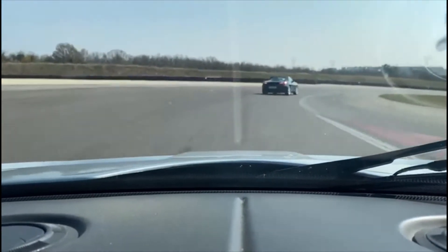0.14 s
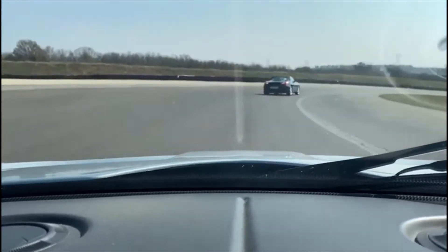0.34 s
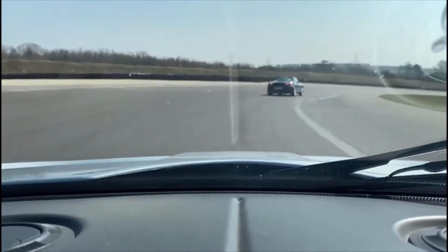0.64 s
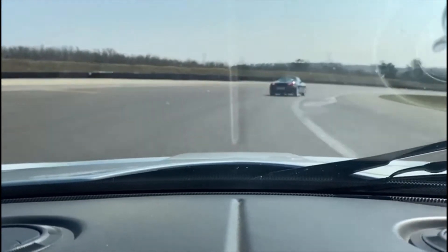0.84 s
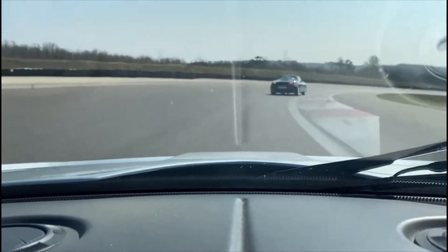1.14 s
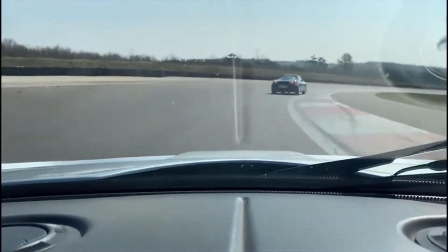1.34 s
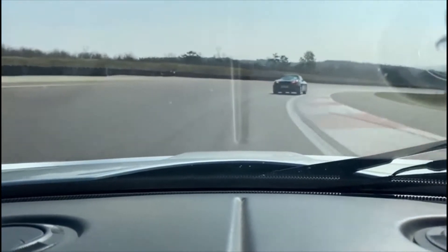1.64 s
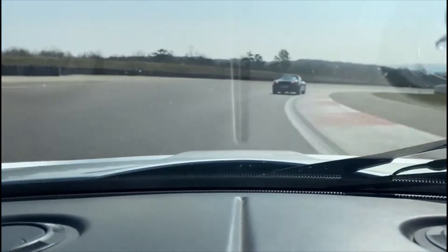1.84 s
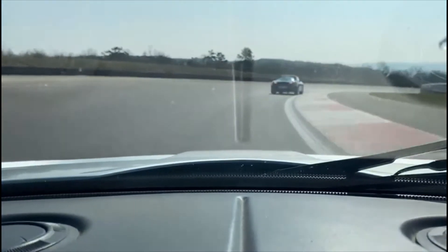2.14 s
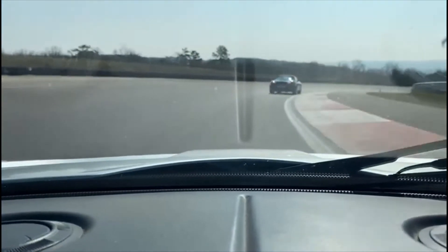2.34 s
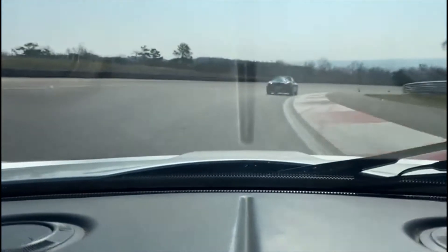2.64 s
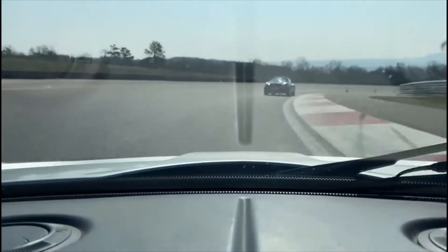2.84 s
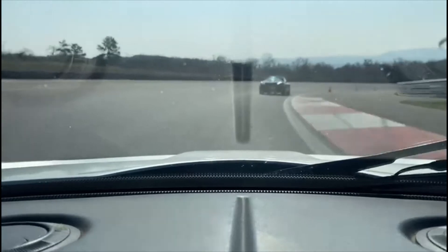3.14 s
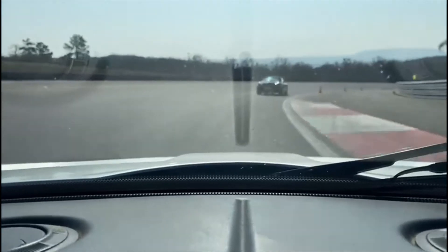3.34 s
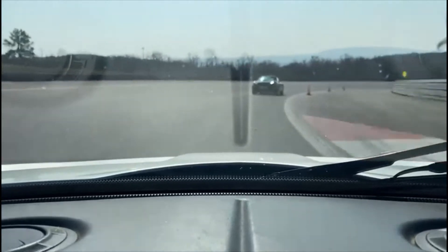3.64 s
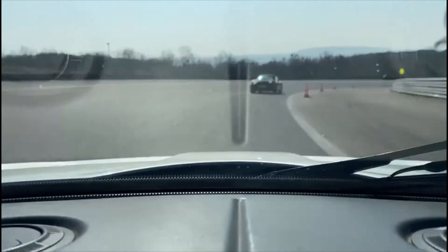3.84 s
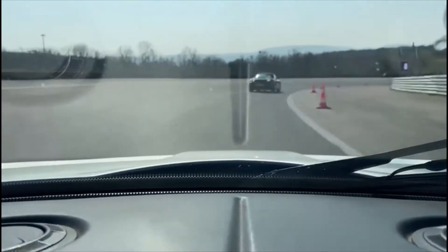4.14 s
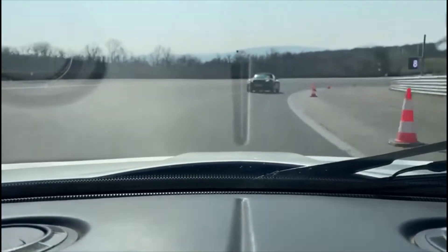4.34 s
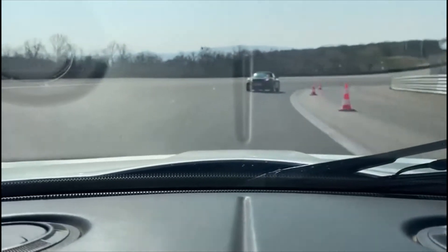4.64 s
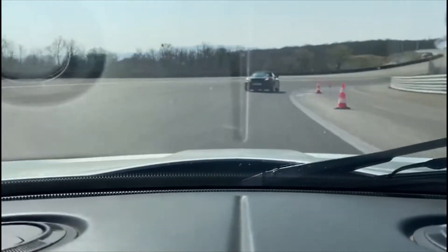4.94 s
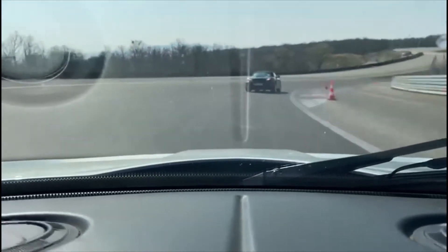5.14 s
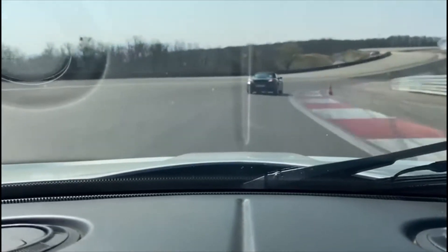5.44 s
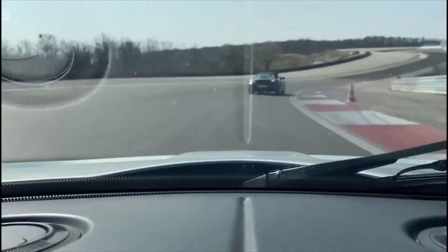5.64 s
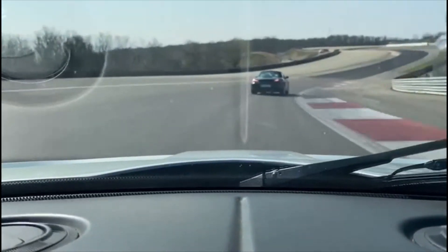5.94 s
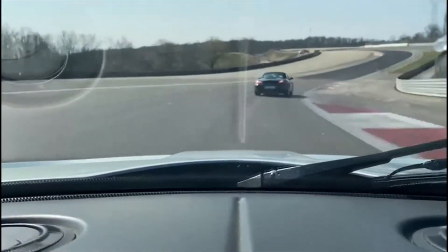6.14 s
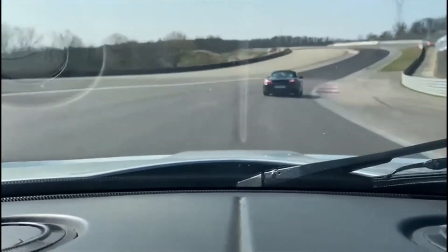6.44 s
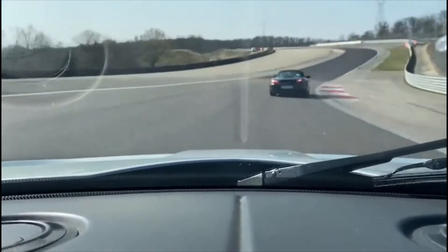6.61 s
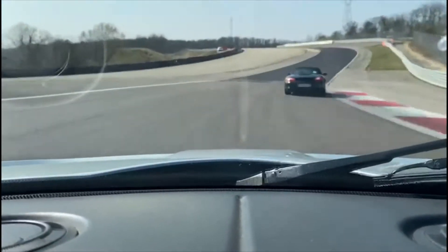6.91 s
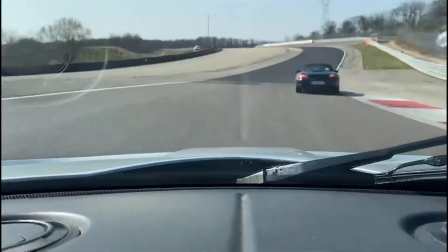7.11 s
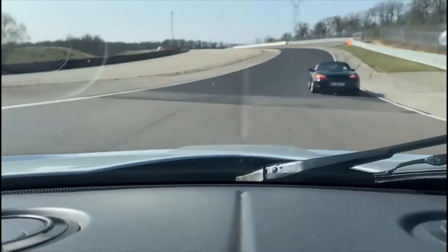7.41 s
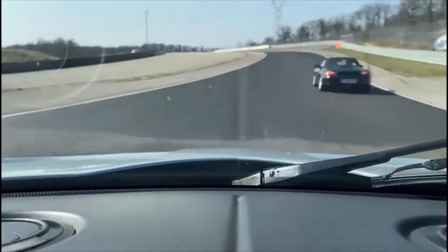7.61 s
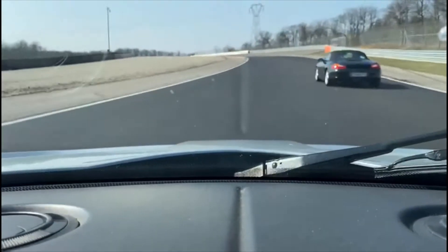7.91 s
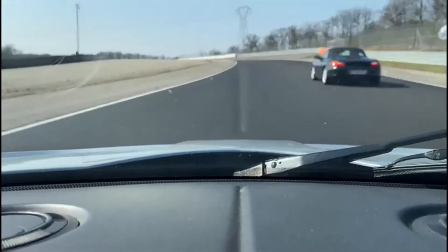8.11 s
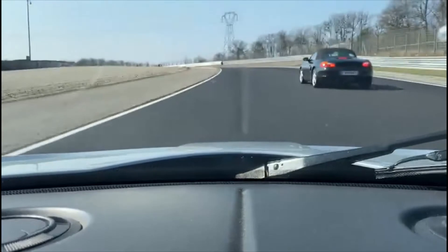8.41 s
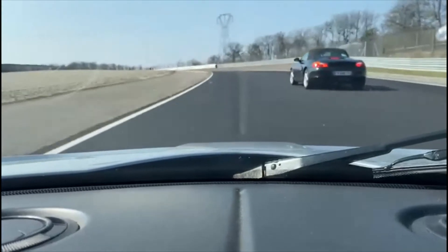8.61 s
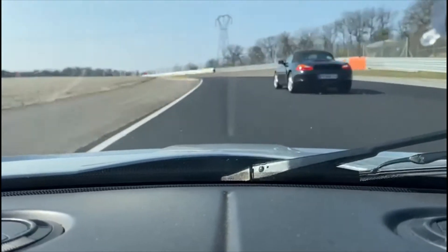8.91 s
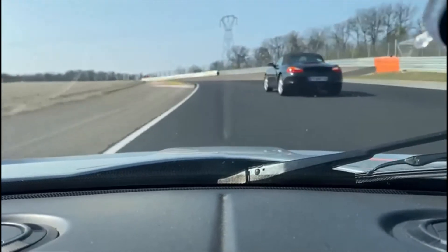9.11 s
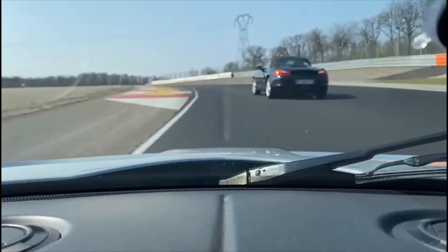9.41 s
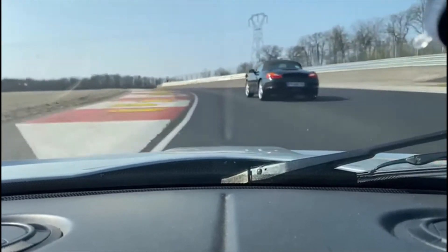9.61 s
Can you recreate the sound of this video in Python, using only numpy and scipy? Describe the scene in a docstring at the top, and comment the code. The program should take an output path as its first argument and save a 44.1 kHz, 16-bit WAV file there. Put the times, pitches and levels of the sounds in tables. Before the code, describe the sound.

Cabin-heard engine boom rises through a long pull over tyre rumble and wind roar, with grit ticks, a sudden lift and coast, then throttle returning.

```python
"""The firing note of a four-cylinder sports car on a race track, heard from behind the windscreen.
It sweeps through the cabin's standing waves: part throttle, a pull from 1.8 s to 7.7 s, then a coast;
the throttle reopens at 9.1 s. Exhaust overtones, rasp, intake hiss and mutter follow revs and throttle.
Shaped noise makes tyre rumble and wind roar; decaying bursts of noise are grit knocking on the body."""
import sys
import numpy as np
from scipy import signal
from scipy.fft import rfft, irfft
from scipy.io import wavfile
from scipy.ndimage import uniform_filter1d, minimum_filter1d

SR = 44100
rng = np.random.default_rng(int(sys.argv[2]) if len(sys.argv) > 2 else 0)


def to_wav(sig):
    """Store sig (one row per channel, or 1-D mono) as 16-bit WAV at the path in sys.argv[1].

    Samples outside -1..1 are clipped; the rate is SR.
    """
    pcm = np.clip(np.atleast_2d(sig), -1, 1) * 32767
    pcm = np.round(pcm).astype(np.int16)
    wavfile.write(sys.argv[1], SR, pcm.T)  # frames by channels


N = 430416
TIME = np.arange(N) / SR
BINS = np.fft.rfftfreq(N, 1 / SR)


def amp(db):
    """Logarithmic level: decibels to amplitude gain."""
    return 10 ** (np.asarray(db) / 20)


def curves(rows):
    """Linear interpolation in time: each column of a table at every sample."""
    s, *columns = np.transpose(rows)
    return [np.interp(TIME, s, column) for column in columns]


def response(rows, hz):
    """Frequency response: each column of a table, read in order along its sorted frequencies."""
    f, *columns = np.transpose(rows)
    return [np.interp(hz, np.sort(f), column) for column in columns]


def read(points, hz):
    """Spectral envelope: levels joined by straight lines over log frequency."""
    f, value = np.transpose(points)
    return np.interp(np.log(hz + 1), np.log(f + 1), value)


def noise(spectrum):
    """Filtered white noise: a random signal with the given power density per Hz."""
    white = rfft(rng.standard_normal(N))
    return irfft(white * amp(read(spectrum, BINS)), N) * np.sqrt(SR / 2)


def wander(rate_hz):
    """Low-passed chance: a slow random modulation of unit size, mostly below the given rate."""
    step = 64  # samples between the points drawn
    count = N // step + 2
    hz = np.fft.rfftfreq(count, step / SR)
    x = irfft(rfft(rng.standard_normal(count)) / (1 + (hz / rate_hz) ** 4), count)
    return np.interp(np.arange(N), np.arange(count) * step, x / x.std())


def pair(centre, across):
    """Sum and difference stereo: left and right from their common and opposed parts."""
    return np.array([centre + across, centre - across])


# engine speed: (time [s], firing rate [Hz])
FIRING_RATE = [(0.0, 153.8), (.6, 156.3), (1.08, 157.8), (1.45, 155.3), (1.85, 161.7), (2.43, 167.5),
               (3.13, 176.5), (3.8, 186.6), (4.44, 194.7), (4.96, 201.9), (5.74, 210.6), (6.4, 218.1),
               (7.04, 224.8), (7.65, 229.4), (7.74, 225.3), (8.0, 221.4), (8.26, 219), (8.72, 202.4),
               (9.1, 187.3), (9.48, 176.2), (9.76, 175)]
# the swing of the driveline after lifting off
SHUNT_S, SHUNT_DEPTH_HZ, SHUNT_RATE_HZ, SHUNT_DECAY_S = 7.68, 11.14, 4.19, 0.17


def revs():
    """Damped oscillation: lifting off rocks the driveline, so the firing rate swings and settles."""
    firing_hz, = curves(FIRING_RATE)
    t = np.maximum(TIME - SHUNT_S, 0)
    swing = np.sin(2 * np.pi * SHUNT_RATE_HZ * t) * np.exp(-t / SHUNT_DECAY_S)
    return firing_hz - SHUNT_DEPTH_HZ * swing


# moves of the pedal: (time [s], new throttle [0-1], time constant of the engine's answer [s])
PEDAL_MOVES = [(.35, 0.84, 0.051), (.72, 0.36, 0.1), (1.18, 0.55, 0.11), (1.759, 0.9, 0.028),
               (7.65, 0.21, 0.015), (9.12, 0.7, 0.12)]
FIRST_THROTTLE = 0.68  # 0-1


def pedal():
    """First-order lag: the throttle eases exponentially toward each new position of the pedal."""
    throttle = np.full(N, FIRST_THROTTLE)
    for s, position, lag_s in PEDAL_MOVES:
        throttle = position + (throttle - position) * np.exp(-np.maximum(TIME - s, 0) / lag_s)
    return np.clip(throttle, 0, 1)


def tone(angle, level_db, balance_db, lead):
    """Standing wave: one engine order reaches the two sides with unequal amplitude and phase."""
    tilt = amp(balance_db)
    size = 2 * amp(level_db) / np.sqrt(1 + tilt ** 2)  # keeps the mean power of the sides
    return size * np.array([tilt * np.cos(angle + lead / 2), np.cos(angle - lead / 2)])


# the cabin's standing wave at the firing rate: (frequency [Hz], level pulling [dB], level coasting [dB],
# left minus right at full throttle [dB], left lead [rad])
BOOM_RESPONSE = [(147, -24, -18, 6, 0), (156.1, -11.5, -11, 1, 0), (161.3, -12.5, -14, -0.5, 0.068),
                 (162.5, -21, -15, 6, -.3), (163.2, -20, -18, 4.5, -0.22), (168.8, -15.5, -15, -2, 0.22),
                 (168.3, -7.5, -15, -2, 0.092), (178.5, -4.5, -20, -1.5, -0.17),
                 (183.4, -7.5, -17.5, -0.5, -0.53), (192.6, -10.5, -23, -6, -.75),
                 (199.7, -8, -26, -4.5, -.35), (216, -15.5, -13.5, -2, -.55), (222, -13.5, -20, -1, -0.29)]
# the exhaust drone's standing wave, an octave higher: (frequency [Hz], level pulling [dB],
# level coasting [dB], left minus right [dB], left lead [rad])
DRONE_RESPONSE = [(304.7, -28.5, -44, -4, 1.6), (327, -10, -31, 2, 1.1), (331.5, -11, -30, 2.5, 1.2),
                  (337, -16.5, -33, 2, 1.86), (347, -24, -38.5, 12.5, 4.5), (349.5, -18.5, -32.5, 6, 6.4),
                  (369, -6.5, -39, -7.5, 7.04), (392.4, -13, -46.5, 1.5, 7.16),
                  (412.6, -20.5, -36, 0.5, 6.55), (438, -24, -39, 6, 7.65), (450, -20, -43, 25, 6.2),
                  (451, -21, -42, 17, 8), (460, -21.5, -46.5, 14, 7.9)]


def firing_note(angle, firing_hz, throttle):
    """Room modes: boom and octave drone sweep the cabin's resonances, less even as the throttle closes."""
    shut = 1 - throttle
    pull_db, coast_db, balance_db, lead = response(BOOM_RESPONSE, firing_hz)
    boom = tone(angle, throttle * pull_db + shut * coast_db, throttle * balance_db, lead)
    loud_db, soft_db, balance_db, lead = response(DRONE_RESPONSE, 2 * firing_hz)
    drone_db = soft_db + throttle ** 3 * (loud_db - soft_db)
    drone = tone(2 * angle + np.pi / 2, drone_db, balance_db, lead)
    # shares by which each tone flutters, pulling and coasting
    boom_rough = throttle * 0.0062 + shut * 0.15
    drone_rough = throttle * 0.061 + shut * 0.2
    return boom * (1 + boom_rough * wander(29)) + drone * (1 + drone_rough * wander(23))


# resonances of exhaust and cabin that make an overtone sing out: (multiple of the firing rate,
# firing rate [Hz], full width at half amplitude [Hz], best throttle [0-1],
# relative level common to both sides [dB], relative level opposed across the cabin [dB])
OVERTONE_RESONANCES = [(.5, 176, 16, 1, -32.5, -55.5), (.5, 227, 10, 1, -34.5, -54),
                       (.75, 215, 11, .9, -29.5, -50.5), (.75, 224.6, 9, .9, -32.5, -49),
                       (1.25, 158.4, 8, .6, -30, -43), (1.25, 165.8, 12, .9, -25.5, -48),
                       (1.25, 192.7, 14, .9, -36, -49.5), (1.5, 158.8, 8, .55, -34, -50),
                       (1.5, 162.5, 6, 1, -28.5, -39), (1.5, 180.5, 12, .8, -29.5, -41.5),
                       (1.5, 195.3, 3.3, 0, -22, -38), (1.5, 222, 17, .2, -34.5, -37),
                       (1.75, 174.4, 8, .9, -36.5, -36.5), (1.75, 197.6, 11, .9, -39.5, -42),
                       (2.5, 164.6, 6, .9, -54.5, -44), (2.5, 178.3, 7.5, 1, -31, -31),
                       (2.5, 220.2, 9, .9, -35.5, -37), (2.5, 227, 7, .9, -46, -26.5),
                       (2.75, 165.6, 9, .9, -45, -39), (3, 173.7, 15, 1, -33.5, -43),
                       (3, 182.8, 7.6, .9, -34, -35), (3, 193, 10, .9, -47, -27),
                       (3, 197.5, 8.7, .9, -39, -35), (3, 206.8, 8.3, .9, -37.5, -39),
                       (3, 218, 8, .9, -55, -38), (3, 226, 9, .9, -60, -33.5), (3, 213, 16, .26, -52, -37),
                       (3.5, 164, 5, .9, -50.5, -34), (3.5, 168.4, 4.3, .9, -49, -30.5),
                       (3.5, 212.5, 8.2, .9, -41.5, -44), (3.5, 225.4, 10, .9, -40.5, -37),
                       (4, 155.6, 3.5, .73, -40.5, -46.5), (4, 160.4, 4.1, .9, -37, -47),
                       (4, 164.6, 4.2, .9, -54, -29.5), (4, 173, 7, .9, -59.5, -41.5),
                       (4, 180.5, 10, .9, -42.5, -51), (4, 197.5, 14, .9, -46, -43),
                       (4, 209, 18, .9, -60.5, -42.5), (4, 219, 9, .26, -62, -44),
                       (4, 179, 6.7, .65, -59.5, -41.5), (4.5, 164.7, 4.5, .9, -38.5, -36),
                       (4.5, 167.7, 7.7, .9, -37, -40), (4.5, 216, 5, .9, -48.5, -42),
                       (4.5, 225, 8.4, .9, -56, -39), (5, 162.2, 4, .9, -42.5, -45.5),
                       (5, 180, 9, .9, -52, -45), (5, 199, 12, .9, -59, -44),
                       (5, 220.5, 4.9, .9, -40.5, -44), (5, 227, 3.6, .9, -49, -48),
                       (5.5, 164.7, 3.2, .9, -46.5, -42.5), (5.5, 170.6, 4.1, .9, -54, -29),
                       (5.5, 224, 6.5, .9, -58, -46), (6, 178.3, 9.9, 1, -39.5, -49),
                       (6, 221.3, 6, .9, -46, -45.5), (6.5, 164, 3.5, .9, -43.5, -42),
                       (6.5, 170.5, 3.2, .9, -58, -38.5), (7, 175, 6, .9, -52, -47),
                       (7, 187.3, 8.3, .9, -48, -46), (8.75, 225.7, 6.5, 0.77, -46.5, -52)]


def flare(multiple, firing_hz, throttle, load_width=0.47):
    """Resonance: common and opposed power of one overtone as revs and load pass its peaks."""
    step = 16  # samples between computed points
    hz, load = firing_hz[::step], throttle[::step]
    power = np.zeros((2, len(hz)))
    for k, centre_hz, width_hz, best_load, common_db, opposed_db in OVERTONE_RESONANCES:
        if k == multiple:
            detuning = (2 * (hz - centre_hz) / width_hz) ** 2
            distance = detuning + (2 * (load - best_load) / load_width) ** 2
            power += (amp([[common_db], [opposed_db]]) * .5 ** distance) ** 2
    return np.repeat(power, step, axis=1)[:, :N]


# faint exhaust overtones; quarter steps come from unequal cylinders: (multiple of the firing rate,
# relative level pulling [dB], relative level coasting [dB])
EXHAUST_ORDERS = [(.5, -45, -39.5), (.75, -44.5, -50.5), (1.25, -44.5, -54), (1.5, -39, -37),
                  (1.75, -44, -52.5), (2.25, -48, -55.5), (2.5, -45, -46.5), (2.75, -53.5, -58.5),
                  (3, -51.5, -46.5), (3.25, -57, -58.5), (3.5, -56, -46.5), (4, -53.5, -51),
                  (4.5, -50.5, -51), (5, -49.5, -52.5), (5.5, -51.5, -59.5), (6, -45.5, -51.5),
                  (6.5, -52, -56.5), (7, -53, -52), (7.5, -54, -53.5), (8, -50.5, -58.5),
                  (8.25, -56.5, -66), (8.75, -59, -70), (10, -54, -69)]


def overtones(angle, firing_hz, throttle, fade_hz=2.6, fade_db=2.8, faint_db=-4.5, flare_db=1.0):
    """Engine orders: multiples of the firing rate fade in and out and sing out at their resonances."""
    common, opposed = np.zeros((2, N))
    for multiple, pull_db, coast_db in EXHAUST_ORDERS:
        size = amp(coast_db) + (amp(pull_db) - amp(coast_db)) * throttle ** 2
        fades = np.array([wander(fade_hz), wander(fade_hz)])
        faint = size * amp(faint_db + fade_db * fades)
        singing_power = amp(flare_db) ** 2 * flare(multiple, firing_hz, throttle)
        flutter = 1 + .2 * wander(17)
        centre, across = np.sqrt(faint ** 2 + singing_power) * flutter
        turn = multiple * (angle + .035 * wander(12))  # phase jitter in radians
        common += centre * np.cos(turn)
        opposed -= across * np.sin(turn)
    return np.sqrt(2) * pair(common, opposed)


def cyclic(x, firing_hz, likeness=0.76, count=4):
    """Cyclostationary noise: valves and pistons sound much alike in every cycle of four firings."""
    cycle = 4 * SR / firing_hz  # samples
    weights = likeness ** np.arange(count)
    repeats = np.zeros_like(x)
    for k, weight in enumerate(weights):
        repeats += weight * x[:, np.arange(N) - np.round(k * cycle).astype(int)]
    return repeats / np.linalg.norm(weights)


def intake_swell(firing_hz, throttle, centre_hz=179, width_hz=8.8):
    """Pipe resonance: under load the intake answers one firing rate, 0-1; full width at 1/e."""
    return throttle * np.exp(-(2 * (firing_hz - centre_hz) / width_hz) ** 2)


# mechanical rasp of the engine: (frequency [Hz], relative density [dB per Hz])
RASP_SPECTRUM = [(200, -89.5), (500, -83), (1080, -76.5), (1250, -74), (1450, -71.5), (1850, -87),
                 (1980, -67.5), (2250, -80), (2500, -70.5), (3000, -81.5), (3700, -79.5), (4600, -85),
                 (7000, -90), (8300, -106), (10000, -100), (11500, -110)]


def rasp(firing_hz, throttle, width=0.33, left_db=3.5):
    """Mechanical noise: repeats by engine cycle, grows with revs and intake resonance, leans left."""
    octaves = np.log2(firing_hz / 200)  # revs counted from a firing rate of 200 Hz
    level_db = -9.5 + 6.5 * octaves + 3.0 * intake_swell(firing_hz, throttle)
    sides = cyclic(pair(noise(RASP_SPECTRUM), width * noise(RASP_SPECTRUM)), firing_hz)
    return amp(level_db) * sides * amp([[left_db], [-left_db]])


# intake hiss common to both sides: (frequency [Hz], relative density [dB per Hz])
HISS_COMMON = [(1000, -110), (3500, -99), (5500, -88), (7000, -87.5), (8300, -102), (9500, -85),
               (10700, -85.5), (11500, -101)]
# the part of the hiss that differs across the cabin: (frequency [Hz], relative density [dB per Hz])
HISS_OPPOSED = [(1000, -110), (5500, -94.5), (6800, -98.5), (8300, -81), (9200, -84.5), (10000, -100),
                (11500, -104)]


def hiss(firing_hz, throttle, opens_hz=204, spread_hz=3):
    """Flow noise: intake air hisses with throttle and resonance, and steps up at high revs."""
    opened = (1 + np.tanh((firing_hz - opens_hz) / spread_hz)) / 2
    level_db = -24.0 + 9.5 * throttle + 8.0 * opened + 3.5 * intake_swell(firing_hz, throttle)
    return amp(level_db) * pair(noise(HISS_COMMON), noise(HISS_OPPOSED))


def engine_bay(angle, firing_hz, throttle, throb=0.33, flicker_db=1.5):
    """Amplitude modulation: rasp and intake hiss come in a puff for each firing."""
    puffs = (1 + throb * np.cos(angle)) * amp(flicker_db * wander(26))
    return puffs * (rasp(firing_hz, throttle) + hiss(firing_hz, throttle))


# low exhaust mutter, stronger as the throttle closes: (frequency [Hz], relative density [dB per Hz])
MUTTER_SPECTRUM = [(60, -72), (115, -48), (170, -43.5), (250, -53), (350, -57.5), (600, -107)]


def exhaust_mutter(throttle):
    """Load-dependent noise: a low exhaust mutter, stronger as the throttle closes."""
    return noise(MUTTER_SPECTRUM) * (1 - throttle) ** 2


def steadied(x, firmness=0.11):
    """Dynamic compression: evens out the lumps of a rumble, so that it drums firmly."""
    power = uniform_filter1d(uniform_filter1d(x ** 2, size=1500), size=1000)
    return x / (power / power.mean() + .1) ** (firmness / 2)


# tyre rumble through the floor: (frequency [Hz], relative density [dB per Hz])
RUMBLE_SPECTRUM = [(10, -70.5), (20, -54), (30, -47), (43, -34), (60, -31.5), (76, -32.5), (95, -39),
                   (115, -41), (140, -46), (300, -52), (900, -100)]
# course of the tyre rumble as the surface changes: (time [s], relative level [dB])
RUMBLE_COURSE = [(0, -21), (2.4, -23), (4.0, -25.5), (5.2, -20.5), (6.6, -23), (7.6, -20.5), (8.15, -19.5),
                 (8.75, -19), (9.76, -22)]


def tyre_rumble(trim_db=0.7):
    """Structure-borne sound: tyres drum on the floor as the road surface changes."""
    drum_db, = curves(RUMBLE_COURSE)
    rumble = steadied(noise(RUMBLE_SPECTRUM))
    return rumble / rumble.std() * amp(drum_db + trim_db)


def patches(x, patchy_db):
    """Spectral modulation: random short patches of the noise are made louder or softer."""
    z = signal.stft(x, nperseg=1024)[2]
    lumps = uniform_filter1d(rng.standard_normal(z.shape), size=4, axis=1)  # along frequency
    lumps = uniform_filter1d(lumps, size=7, axis=2)  # along time
    gain = amp(patchy_db * lumps / lumps.std())
    return signal.istft(z * gain / np.sqrt(np.mean(gain ** 2)))[1][:, :N]


# wind and road roar common to both sides: (frequency [Hz], relative density [dB per Hz])
ROAR_COMMON = [(60, -69.5), (160, -46), (215, -47.5), (270, -52), (400, -56), (640, -63), (1060, -64.5),
               (1350, -68.5), (1700, -68.5), (1860, -73), (2400, -81), (3700, -84), (4600, -90),
               (7000, -93.5), (8300, -108), (9700, -93.5), (11500, -106)]
# the part of the roar that differs across the cabin: (frequency [Hz], relative density [dB per Hz])
ROAR_OPPOSED = [(20, -74.5), (55, -62), (95, -68.5), (170, -63.5), (320, -55), (620, -57), (1000, -59.5),
                (1300, -65), (1700, -71.5), (2350, -84.5), (2700, -83), (4200, -89), (5800, -92.5),
                (11000, -108)]
# course of the roar: (time [s], relative level of its body [dB], of its middle [dB], of its top [dB])
ROAR_COURSE = [(0, -2, .3, -0.6), (1.2, 1.5, .5, 0.5), (2.2, 1.5, 3.5, 3), (3.2, 3, 4, 6), (3.9, -1, 0, 1),
               (4.7, -3.5, -1.3, -0.5), (5.5, 0, 1, 1.8), (6.7, 1, 1.5, 4), (7.8, .5, 0, 2),
               (8.6, 0, -3.5, 2), (9.76, 0.5, -.3, 1.5)]


def wind_roar(trim_db=-3.0, buffet_db=0.32, patchy_db=3.0, body_hz=600, top_hz=2000):
    """Aerodynamic noise: air buffets the glass, the roar's three bands rising and falling apart."""
    body_db, middle_db, top_db = curves(ROAR_COURSE)
    roar = patches(pair(noise(ROAR_COMMON), noise(ROAR_OPPOSED)), patchy_db)
    spectrum = rfft(roar)
    body = irfft(spectrum / (1 + (BINS / body_hz) ** 4), N)
    top = roar - irfft(spectrum / (1 + (BINS / top_hz) ** 8), N)
    middle = roar - body - top
    roar = body * amp(body_db) + middle * amp(middle_db) + top * amp(top_db)
    return roar * amp(trim_db + buffet_db * wander(32))


# grit striking the body; a hard strike rings several spots: (time [s], level before decay [dB],
# pitch of the struck spot [Hz], time to decay by 60 dB [s], share of broad crack [0-1])
GRIT_STRIKES = [(6.157, -44, 9960, .06, 0.01), (6.464, -29.5, 2500, .075, .3),
                (6.467, -43, 10000, .07, .03), (6.468, -24.5, 660, .15, .02),
                (6.471, -26.5, 1450, .09, .04), (6.485, -33.5, 2700, .08, .35),
                (6.788, -29.5, 2550, .1, .3), (6.789, -29, 1300, .07, .06), (6.791, -41.5, 5500, .13, .16),
                (7.38, -49, 10160, 0.036, 0.1), (8.351, -45, 10000, .077, 0.3),
                (8.956, -42, 4513, 0.084, 0.9)]


def grit(width_octaves=0.17, width=0.64, panel_hz=1500, panel_octaves=1.2):
    """Impact excitation: a stone jolts the whole panel and rings around the pitch of the spot it hits."""
    out, t = np.zeros((2, N)), np.arange(SR // 4) / SR
    hz = np.fft.rfftfreq(len(t), 1 / SR) + 1
    panel = 1 / (1 + (np.log2(hz / panel_hz) / panel_octaves) ** 2)
    for s, db, spot_hz, t60, crack in GRIT_STRIKES:
        spot = 1 / (1 + (np.log2(hz / spot_hz) / width_octaves) ** 2)
        colour = (1 - crack) * spot + crack * panel
        ring = irfft(rfft(rng.standard_normal((2, len(t)))) * colour, len(t))
        ring *= amp(db) / ring.std() * np.exp(-np.log(1000) * t / t60)
        part = out[:, round(s * SR):][:, :len(t)]
        part += pair(ring[0], width * ring[1])[:, :part.shape[1]]
    return out


def scene():
    """Superposition: revs and throttle drive every engine layer; road, wind and grit are added."""
    firing_hz, throttle = revs(), pedal()
    unsteady_hz = firing_hz * (1 + 0.0019 * wander(10.6))
    angle = 2 * np.pi * np.cumsum(unsteady_hz) / SR
    engine = firing_note(angle, firing_hz, throttle)
    engine = engine + overtones(angle, firing_hz, throttle) + engine_bay(angle, firing_hz, throttle)
    return engine + exhaust_mutter(throttle) + tyre_rumble() + wind_roar() + grit()


def record(dry, edge_hz=11220):
    """Peak limiting, then band limiting: loud peaks are eased under full scale and low-passed."""
    room = np.minimum(1, .97 / (abs(dry).max(0) + 1e-9))
    gain = uniform_filter1d(minimum_filter1d(room, size=901), size=901)
    lowpass = signal.firwin(511, edge_hz, window=("kaiser", 9), fs=SR)
    return signal.oaconvolve(dry * gain, lowpass[None], "same")


dry = scene()
out = record(dry)
to_wav(out)
```